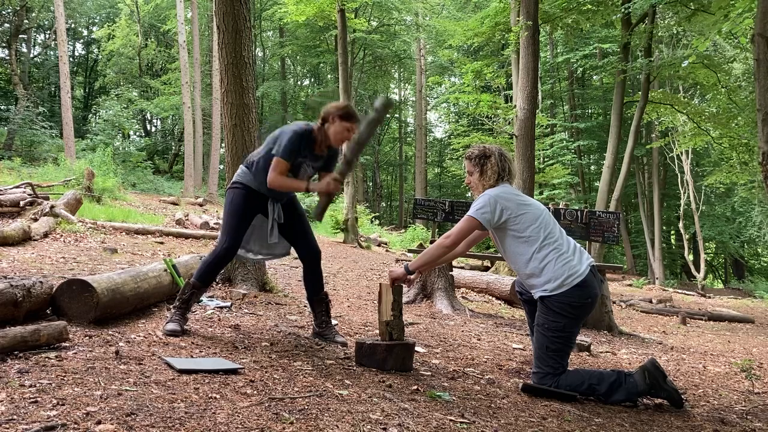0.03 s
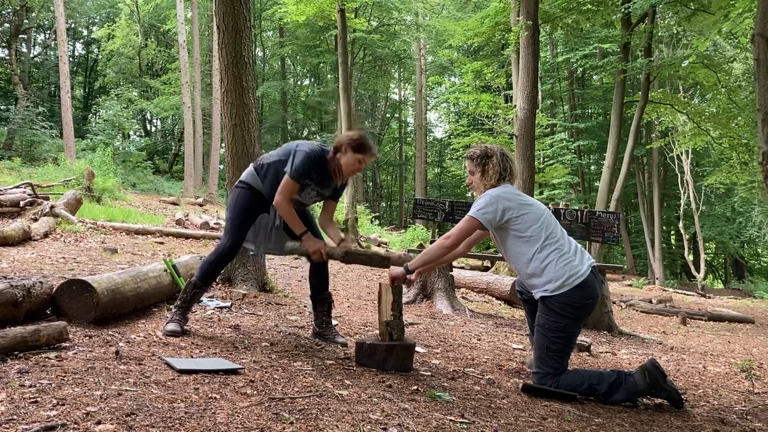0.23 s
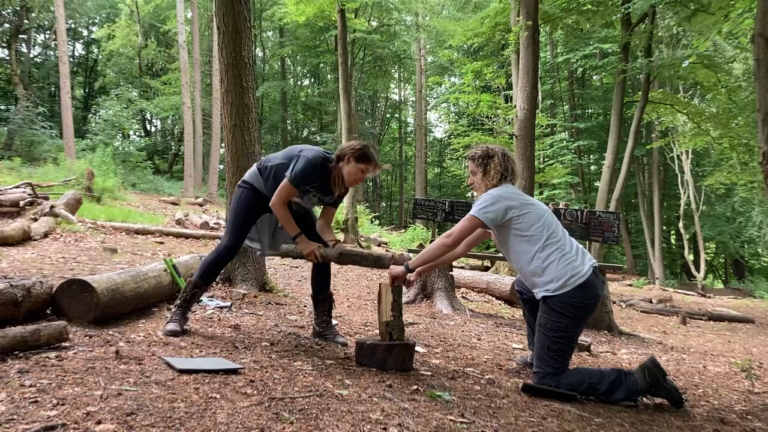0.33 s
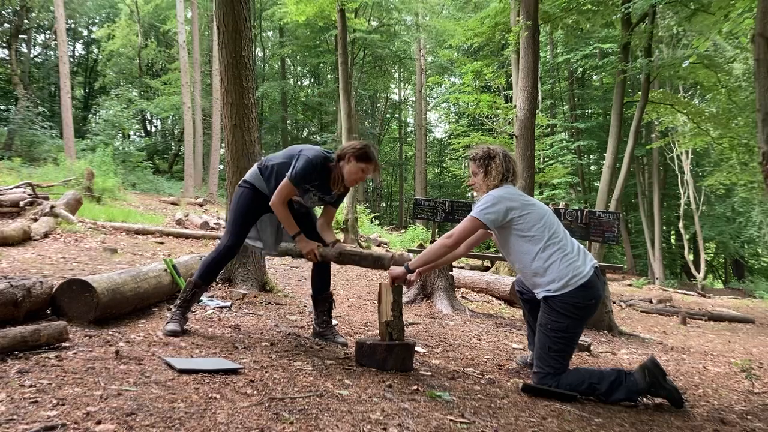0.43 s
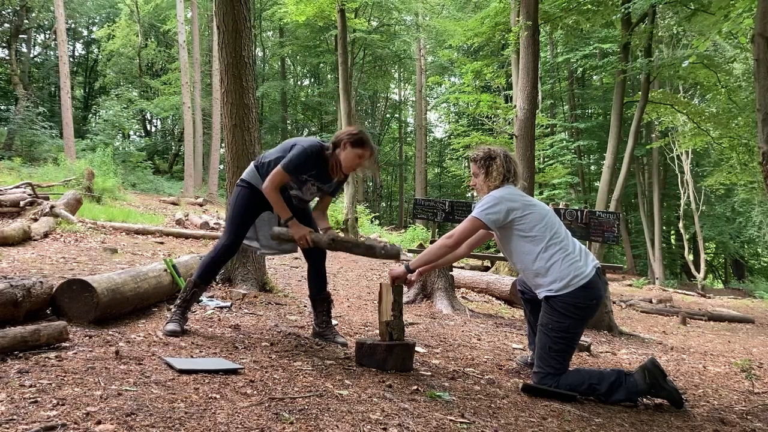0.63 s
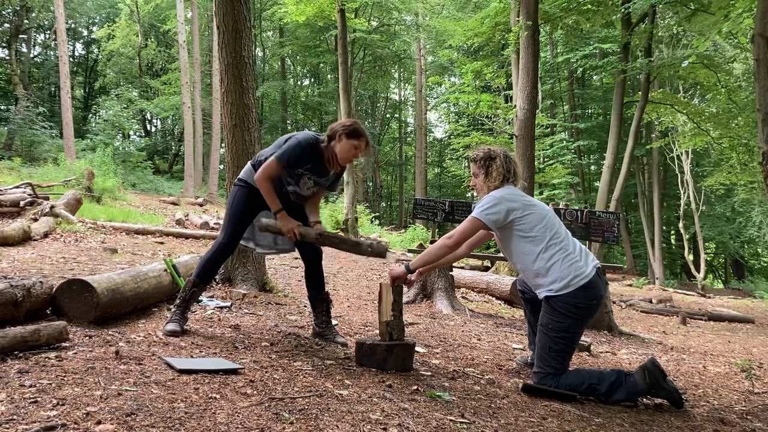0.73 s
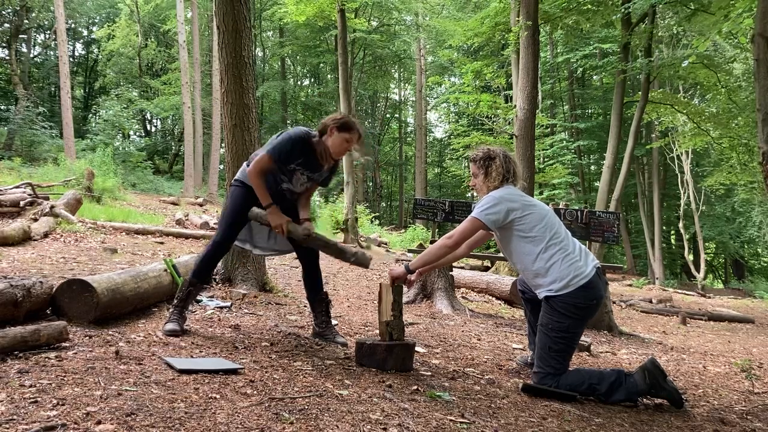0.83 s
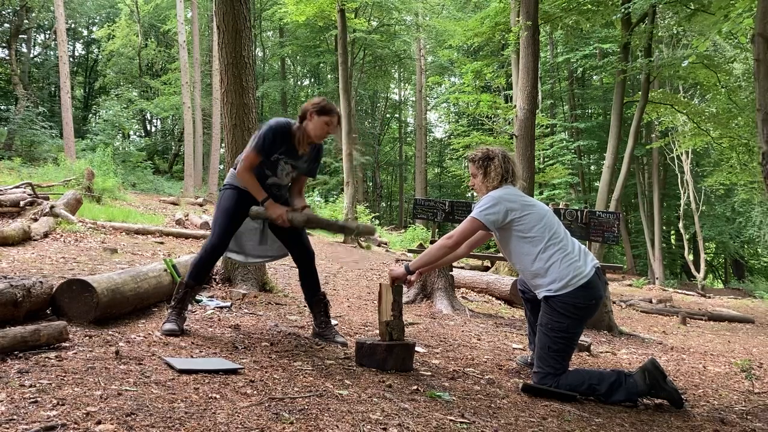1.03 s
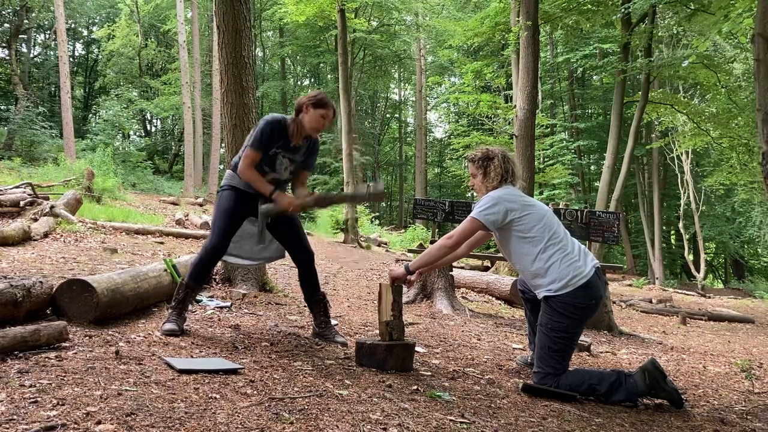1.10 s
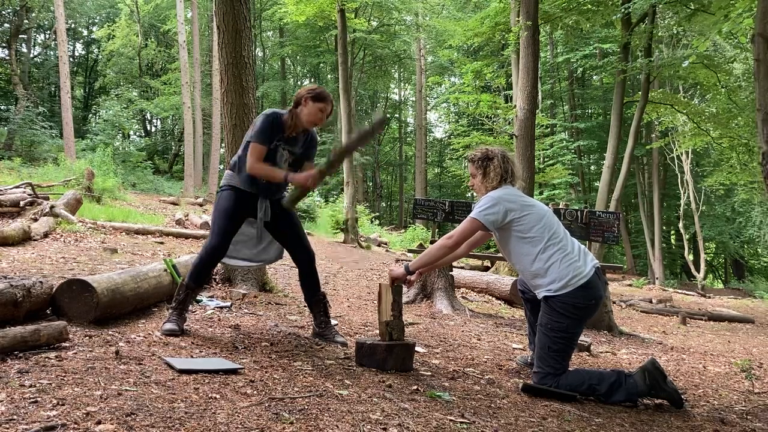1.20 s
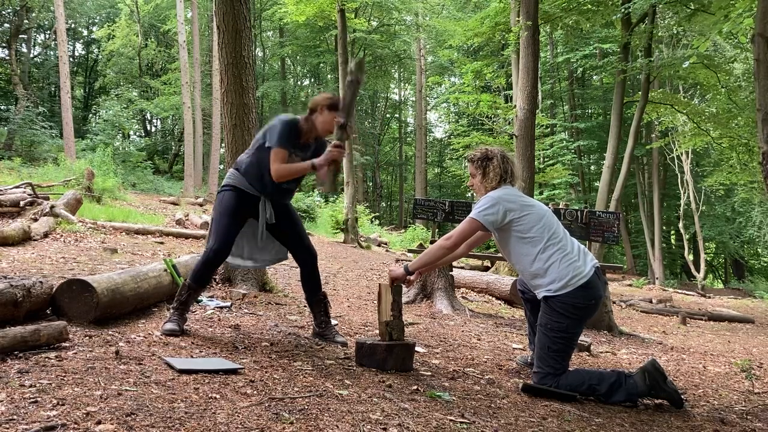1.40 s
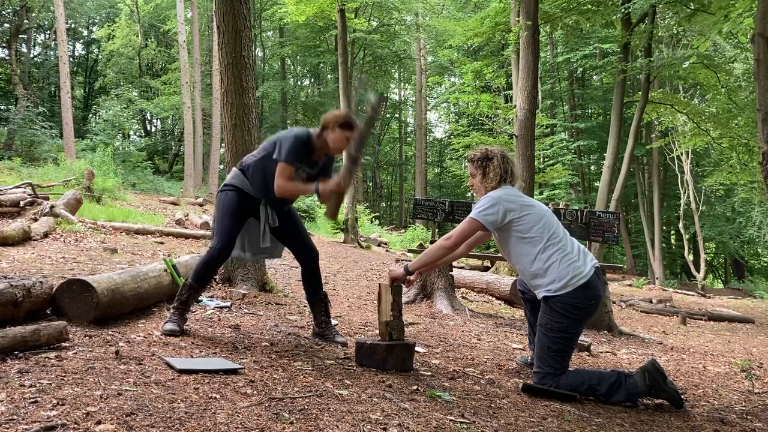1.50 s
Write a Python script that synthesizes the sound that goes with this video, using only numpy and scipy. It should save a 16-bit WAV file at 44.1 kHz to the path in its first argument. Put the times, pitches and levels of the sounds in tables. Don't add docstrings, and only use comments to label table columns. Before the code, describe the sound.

One hard woody knock of club on blade and log, ringing among trees, with small birdsong

```python
import sys
import numpy as np
from scipy import signal
from scipy.fft import rfft, irfft
from scipy.io import wavfile
from scipy.ndimage import uniform_filter1d, minimum_filter1d

SR = 44100
rng = np.random.default_rng(int(sys.argv[2]) if len(sys.argv) > 2 else 0)


def magnitude_from_level(level_db):
    exponent = np.asarray(level_db, float) / 20
    return 10 ** exponent


def output_pcm(signal):
    pcm = np.clip(np.atleast_2d(signal).T, -1, 1) * 32767
    wavfile.write(sys.argv[1], SR, np.round(pcm).astype(np.int16))


N = 68355

# pitch_hz, level_db (per Hz)
AIR_SPECTRUM = [(25, -13.5), (60, 1.5), (112, -0.5), (190, -17), (1000, -27), (2400, -38.5), (6500, -42.5),
                (10000, -54.5)]
# pitch_hz, likeness_share
PORT_LIKENESS = [(60, 1), (130, 1), (290, 0.43), (640, -0.19), (1400, -.1), (3000, 0.22), (8000, 0.095)]
# pitch_hz, t60_s, level_db
TRUNK_SCATTER = [(60, 0.34, -3), (149.7, 0.57, 7), (433, 0.64, -7), (900, 1, -2), (1860, .6, -5.5),
                 (3800, 0.94, -5.5), (7360, 0.62, -7), (12000, 0.1, 1)]
# pitch_hz, width_octaves, level_db, t60_s
FAR_ECHOES = [(2800, 0.71, -64.5, 1.5), (6800, 0.041, -82.5, 1.9), (7100, .06, -85.5, 15),
              (6600, .03, -80, 69)]
# start_s, pitch_hz, level_db
FAR_SONGS = [
    [(0, 3150, -63), (.02, 2601, -65.5), (.036, 2125, -68)],
    [(0, 5680, -83), (.05, 5200, -76), (.062, 5050, -78)],
    [(1.37, 2574, -65), (1.385, 2740, -78.5), (1.4, 3290, -63.5)],
    [(1.42, 3800, -69.5), (1.435, 3484, -67.5), (1.47, 3417, -70)],
    [(1.45, 6676, -93), (1.5, 6600, -64), (1.53, 6600, -77)],
    [(.11, 4130, -89), (.15, 4180, -76), (.18, 4000, -84)],]
# offset_s, pitch_hz, level_db
SLIDE_SHAPE = [(0, 6150, -27), (.012, 5600, -15), (.025, 5520, -14), (.04, 4790, -3), (.052, 4630, -9),
               (.06, 4880, -16)]
# start_s, level_db
SLIDE_TIMES = [
    (0.047, -52),
]
# offset_s, pitch_hz, level_db
DIP_SHAPE = [(0, 6160, -16.5), (.01, 6050, -8), (.022, 5800, -0.5), (.034, 5682, -2.5), (.045, 5500, -16.5)]
# start_s, level_db
DIP_TIMES = [
    (.190, -59.5),
    (1.517, -57),
]
# start_s, pitch_hz, level_db
SEEP_NOTES = [(0.44, 6880, -69), (0.446, 6900, -63.5), (0.458, 6920, -51.5), (0.478, 7350, -54),
              (.49, 7330, -71), (0.534, 7470, -67.5), (0.558, 7504, -54.5), (0.574, 7440, -62.5),
              (0.585, 7390, -57)]
# offset_s, pitch_hz, level_db
CHIRP_SHAPE = [(0, 4900, -17), (.006, 5750, -9), (.011, 5400, -3), (.017, 4600, 0), (.026, 3850, -11),
               (.035, 3520, -5), (.05, 3230, -16)]
# start_s, level_db
CHIRP_TIMES = [
    (0.6468, -52),
    (0.7634, -51.5),
    (0.8764, -51.5),
    (0.9897, -51),
]
# start_s, pitch_hz, level_db
WARBLE_NOTES = [(1.088, 7624, -61), (1.098, 8210, -60.5), (1.122, 6640, -49), (1.134, 7505, -53.5),
                (1.143, 7790, -58.5), (1.16, 6959, -54), (1.168, 6660, -60.5), (1.172, 6830, -88.5),
                (1.175, 6810, -49)]
# start_s, pitch_hz, level_db
WHISTLE_NOTES = [(1.243, 4680, -69), (1.254, 4614, -53), (1.264, 4496, -47), (1.275, 4385, -58.5),
                 (1.306, 4324, -45), (1.335, 4295, -52), (1.349, 4336, -52), (1.36, 4170, -57)]
# start_s, pitch_hz, level_db
RISING_NOTE = [(1.424, 6354, -60.5), (1.44, 7750, -55.5), (1.45, 8320, -45.5), (1.458, 8720, -62),
               (1.464, 8600, -91)]
# pan_db, left_lead_s, echo_db
PERCHES = [
    (1, 0.000027, -2),
    (1.5, 0.00001, 3.5),
    (4, 0.000011, 4.5),
    (2, 0.000013, 1),
    (1, 0.00003, -2.5),
    (-2.5, .00001, -4),
    (1.5, 0.000059, 4),
]
# start_s, level_db
GRIT_TICKS = [
    (.3585, -53.5),
    (.3665, -49.5),
    (.3785, -55),
]
# start_s, level_db, thump_db, crack_db
CLUB_BLOWS = [
    (0.229, 2, -10, -18.5),
    (0.3713, -28, -16.5, -23),
]
# pitch_hz, level_db, t60_s, swell_s
BODY_MODES = [(150.6, -1.5, 0.046, 0.0022), (205, -8.5, .035, 0.006), (315.6, -14.5, 0.13, 0.0019),
              (443, 1, 0.027, 0.0029), (669.9, -6, .03, 0.002), (854, -14, 0.087, 0.0028),
              (970, -0.5, 0.023, 0.0015), (1210, -13.5, 0.046, 0.00067), (1576, -2.5, 0.024, 0.0029),
              (1760, -11.5, 0.027, 0.0016), (2250, -5, 0.018, 0.001), (2720, -13, 0.015, .001),
              (2850, -15.5, 0.02, 0.00088),
              (915, -30.5, .25, 0.018), (3020, -17.5, 0.026, .001), (3410, -21, 0.022, 0.0009),
               (3973, -20, 0.029, 0.00067), (4110, -26.5, 0.036, .001), (4600, -24.5, 0.034, 0.00091),
               (4880, -25.5, 0.024, 0.00051), (5710, -29, .03, 0.003), (6140, -28, .03, 0.00058),
               (6900, -17.5, 0.027, 0.0022), (7740, -28.5, .025, .001)]
# pitch_hz, level_db, t60_s, swell_s
CLUB_MODES = [(153, -1.5, 0.07, 0.0049), (250, -3, .04, 0.0017), (363, 0.5, 0.082, 0.0016),
              (596, -5, 0.046, 0.0013), (747, -13, .04, .002), (1064, -12, 0.033, 0.001),
              (1584, -14.5, 0.047, 0.001)]
# pitch_hz, level_db
SENT_TO_TRUNKS = [(60, 6.5), (150, 10), (350, 8), (900, 5), (2000, 1), (4000, -9), (8000, -3.5),
                  (13000, -8)]
# pitch_hz, width_octaves, level_db
LOG_RINGS = [(911.6, 0.18, 6), (910, 0.048, 7), (2890, 0.0054, 9), (3954, 0.024, 9), (335, 0.3, 8)]
# pitch_hz, level_db
MIC_COLOUR = [(20, -32), (45, -9.5), (70, -2), (7800, 0), (9200, -13), (10200, 2), (12600, -1), (14500, -9)]
# pitch_hz, level_db
MUTE_FLOOR = [(4500, -135), (6000, -118), (7800, -114), (9000, -114), (11000, -116), (14000, -118)]

TIME = np.arange(N) / SR
FREQ = np.fft.rfftfreq(N, 1 / SR)
SIDE = np.array([[.5], [-.5]])
TOP_HZ = 16400


def read(table, hz, column=1):
    a = np.array(table, float)
    return np.interp(np.log(hz), np.log(a[:, 0]), a[:, column])


def unit(x):
    return x / np.sqrt(np.mean(x ** 2))


def bell(f, hz, width):
    return np.exp(-.5 * (np.log2(f / hz) / width) ** 2)


def bands(x, hz, width):
    f = np.fft.rfftfreq(x.shape[-1], 1 / SR) + 1
    return irfft(rfft(x) * bell(f, hz, width), x.shape[-1])


def walk(size):
    once = uniform_filter1d(rng.standard_normal(N), size=size)
    return unit(uniform_filter1d(once, size=size))


def pair(like=None):
    mid, side = rfft(rng.standard_normal((2, N)))
    if like is None:
        like = read(PORT_LIKENESS, FREQ + 1)
    like = np.clip(like, -1, 1)
    shared = np.sqrt(1 + like) * mid
    opposed = np.sqrt(1 - like) * side * np.array([[1], [-1]])
    return irfft(shared + opposed, N) / np.sqrt(2)


def ports(x, pan_db, lead_s):
    return irfft(rfft(x) * np.exp(2j * np.pi * FREQ * lead_s * SIDE), N) * magnitude_from_level(pan_db * SIDE)


def duck():
    after = TIME - CLUB_BLOWS[0][0]
    return -8 * (after > 0) * np.exp(-(after / .33) ** 6)


def air():
    wind = 0
    for hz in 32 * 2 ** np.arange(0, 8.6, .5):
        swell_db = .8 * walk(size=5000)
        flicker_db = 1.6 * walk(size=1200)
        db = read(AIR_SPECTRUM, hz) + swell_db + flicker_db
        wind = wind + magnitude_from_level(db) * bands(pair(), hz, .2)
    hiss_db = -94.5 + duck() + 2 * walk(size=3000)
    return magnitude_from_level(-54.5) * unit(wind) + magnitude_from_level(hiss_db) * unit(bands(pair(), 11200, 0.15))


def trunks():
    noise = pair()
    tail = 0
    for hz in 45 * 2 ** np.arange(0, 8.1, .5):
        t60, db = read(TRUNK_SCATTER, hz, 1), read(TRUNK_SCATTER, hz, 2)
        tail = tail + bands(noise, hz, .2) * magnitude_from_level(db - 60 * TIME / t60)
    early = 1 + magnitude_from_level(4) * np.exp(-TIME / 0.026)
    tail = tail * early * np.clip(TIME / 0.0049, 0, 1)
    energy = np.sum(bands(tail, 3400, 0.54) ** 2)
    return tail / np.sqrt(energy / np.mean(bands(noise, 5500, 0.72) ** 2))


def through_trunks(x, echo):
    return signal.fftconvolve(x[None], echo, axes=1)[:, :N]


def far_echoes():
    out = 0
    for hz, width, db, t60 in FAR_ECHOES:
        out = out + unit(bands(pair(), hz, width)) * magnitude_from_level(db - 60 * TIME / t60)
    return out


def note(rows, start=0., db=0.):
    s, hz, level = np.array(rows, float).T
    t = TIME - start
    ends = np.clip(np.minimum(t - s[0], s[-1] - t) / .003, 0, 1)
    glide = uniform_filter1d(np.interp(t, s, hz), size=100)
    tone = np.sin(2 * np.pi * np.cumsum(glide) / SR)
    return np.sqrt(2) * magnitude_from_level(np.interp(t, s, level) + db) * ends * tone


def birds(echo):
    chirps = sum(note(CHIRP_SHAPE, *c) for c in CHIRP_TIMES)
    slides = sum(note(SLIDE_SHAPE, *c) for c in SLIDE_TIMES)
    dips = sum(note(DIP_SHAPE, *c) for c in DIP_TIMES)
    far = sum(note(f) for f in FAR_SONGS)
    songs = [chirps, note(SEEP_NOTES), note(WARBLE_NOTES), note(WHISTLE_NOTES), note(RISING_NOTE),
             slides + dips, far]
    out = 0
    for song, (pan_db, lead_s, echo_db) in zip(songs, PERCHES):
        out = out + ports(song, pan_db, lead_s) + magnitude_from_level(echo_db) * through_trunks(song, echo)
    return out


def ticks():
    starts, levels = np.array(GRIT_TICKS)[:, :1], np.array(GRIT_TICKS)[:, 1:]
    t = np.clip(TIME - starts, 0, None) / .0012
    clicks = np.sum(magnitude_from_level(levels) * t * np.exp(1 - t), axis=0)
    return unit(bands(pair(.5), 13500, .35)) * clicks


def swish():
    ahead = CLUB_BLOWS[0][0] - TIME
    return unit(bands(pair(), 2000, 1.6)) * magnitude_from_level(-51) * (ahead > 0) * np.exp(-np.abs(ahead) / .013)


def scatter(echo):
    f = FREQ + 1
    rings = sum(db * bell(f, hz, width) for hz, width, db in LOG_RINGS)
    sent = irfft(rfft(echo) * magnitude_from_level(5 + read(SENT_TO_TRUNKS, f) + rings), N)
    late = int(CLUB_BLOWS[0][0] * SR)
    return np.pad(sent, ((0, 0), (late, 0)))[:, :N]


def lean(hz):
    return magnitude_from_level(SIDE * -3 / (1 + hz / 300))


def ring(modes, t):
    body = 0
    for k, (hz, db, t60, swell) in enumerate(modes):
        part = (-1) ** k * SIDE * min(hz / 24000, 1) ** .5 * np.pi / 2
        level = magnitude_from_level(db - 60 * t / t60) * (1 - np.exp(-t / swell)) ** 2
        body = body + lean(hz) * level * np.sin(2 * np.pi * hz * t + part)
    return body


def crack(t):
    crack_s, splinter_s = .0013, .010
    noise = unit(bands(pair(-.3), 6500, .8))
    burst = noise * t / crack_s * np.exp(1 - t / crack_s)
    fibres = noise - bands(noise, TOP_HZ, .2)
    return burst + fibres * magnitude_from_level(-18.5) * (t > 0) * np.exp(-t / splinter_s)


def thump(t):
    low_hz, start_hz, fall_s = 73.5, 106, 0.0045
    late_s, rise_s, hold_s = 0.017, 0.00047, 0.009
    u = np.clip(t - late_s, 0, None)
    turns = low_hz * u + (start_hz - low_hz) * fall_s * (1 - np.exp(-u / fall_s))
    swell = (1 - np.exp(-u / rise_s)) * np.exp(-(u / hold_s) ** 2 / 2)
    return lean(low_hz) * np.sin(2 * np.pi * turns) * swell


def blow(modes, start, db, thump_db, crack_db):
    t = np.clip(TIME - start, 0, None)
    return magnitude_from_level(db) * (ring(modes, t) + magnitude_from_level(crack_db) * crack(t) + magnitude_from_level(thump_db) * thump(t))


def scene():
    echo = trunks()
    hits = blow(BODY_MODES, *CLUB_BLOWS[0]) + blow(CLUB_MODES, *CLUB_BLOWS[1])
    returned = magnitude_from_level(-31.5) * through_trunks(hits.mean(axis=0), echo) + scatter(echo)
    background = air() + far_echoes() + birds(echo)
    return background + ticks() + swish() + hits + returned


def mute(x):
    f, _, z = signal.stft(x, SR, nperseg=2048)
    power = np.mean(np.abs(z) ** 2, axis=0)
    db = 10 * np.log10(uniform_filter1d(power, size=16, axis=0) + 1e-18)
    loudest_below = -minimum_filter1d(-db, size=70, axis=0, origin=34)
    masked = loudest_below + np.where(f < 6400, -37, -200)[:, None]
    floor = np.maximum(read(MUTE_FLOOR, f + 1)[:, None], masked)
    floor = np.where(f[:, None] > MUTE_FLOOR[0][0], floor, -200)
    step = np.arange(len(f)) // 16 * 16
    gain = magnitude_from_level(-27 * np.clip(floor - db, 0, 1)[step])
    return signal.istft(z * gain, SR, nperseg=2048)[1][:, :N]


def low_pass(x):
    return signal.sosfilt(signal.butter(12, 16580, fs=SR, output="sos"), x)


def record(dry):
    heard = irfft(rfft(dry) * magnitude_from_level(read(MIC_COLOUR, FREQ + 1)) * (FREQ + 1 < TOP_HZ), N)
    limited = np.tanh(heard * 0.81) / 0.76
    return low_pass(mute(limited))


dry = scene()
out = record(dry)
output_pcm(out)
```